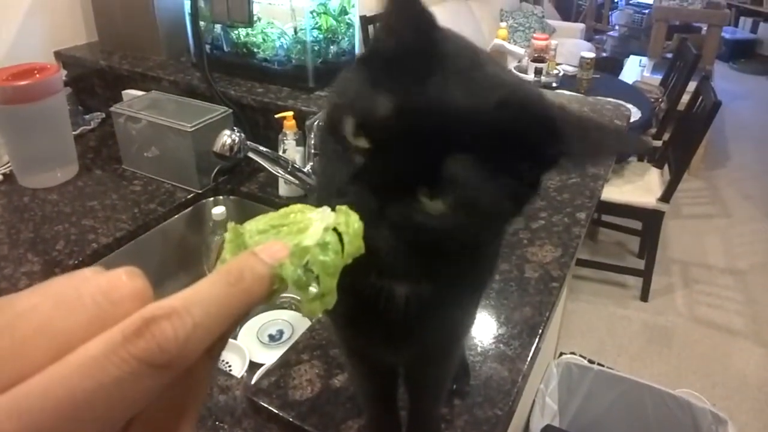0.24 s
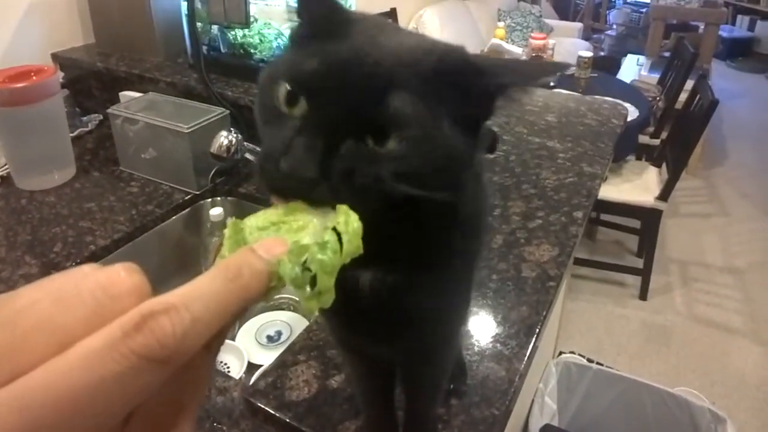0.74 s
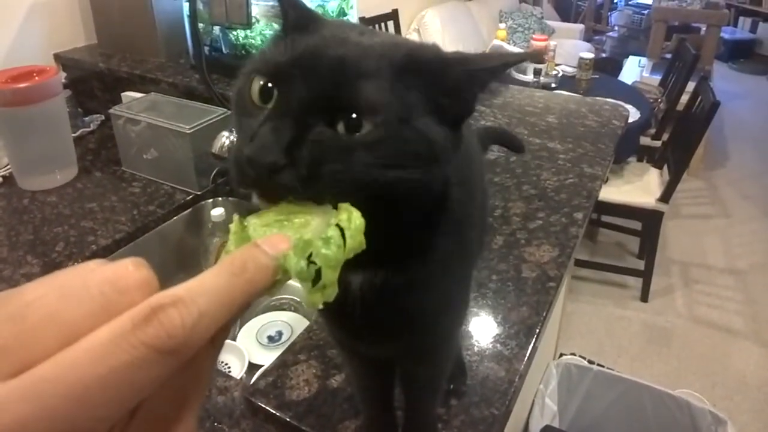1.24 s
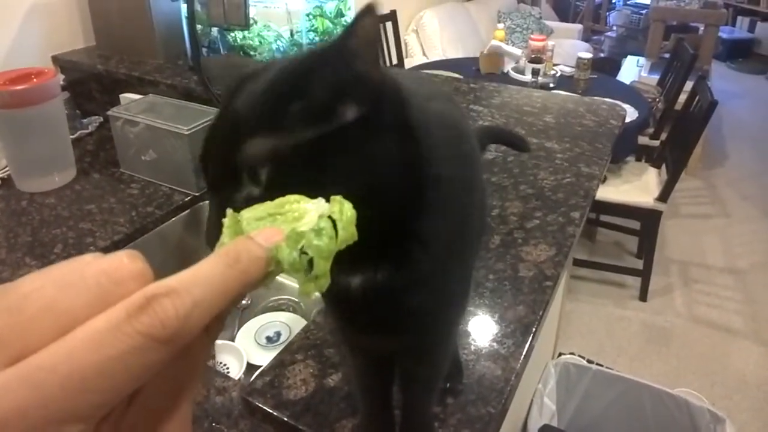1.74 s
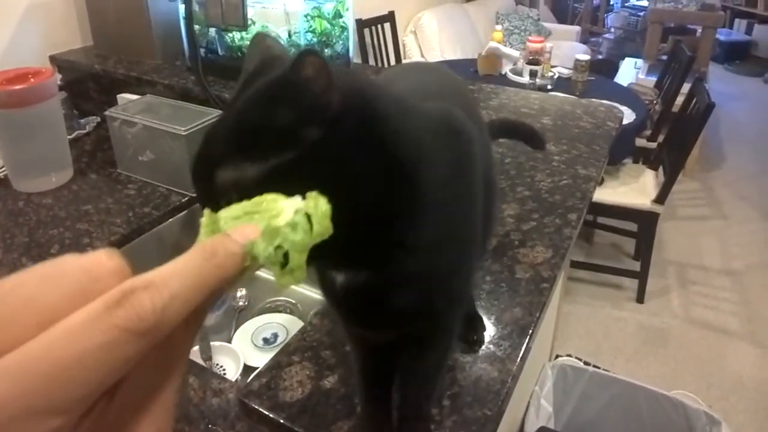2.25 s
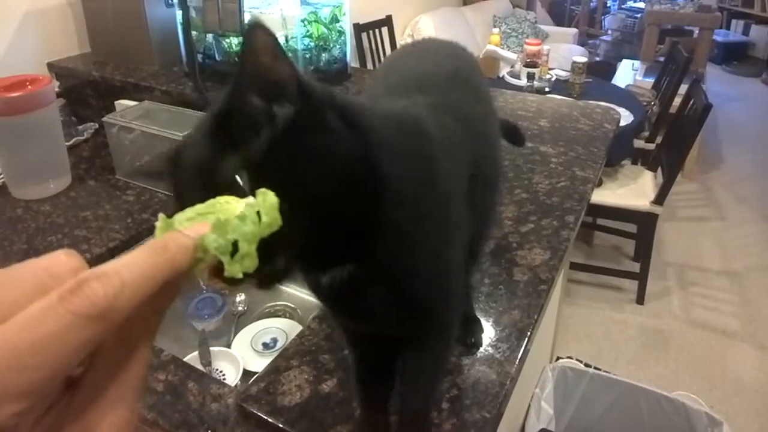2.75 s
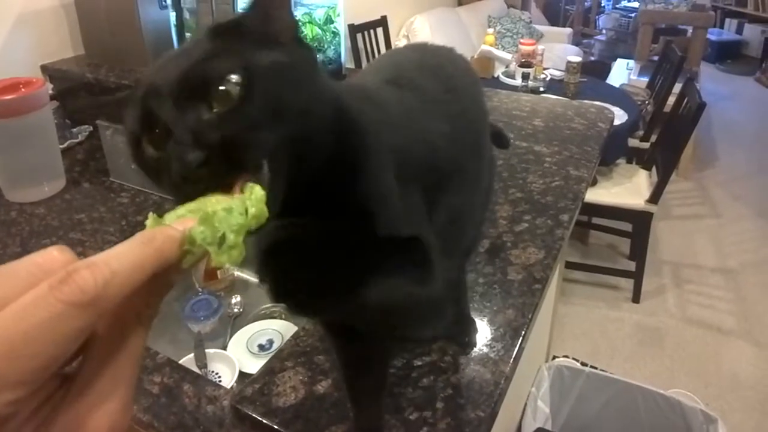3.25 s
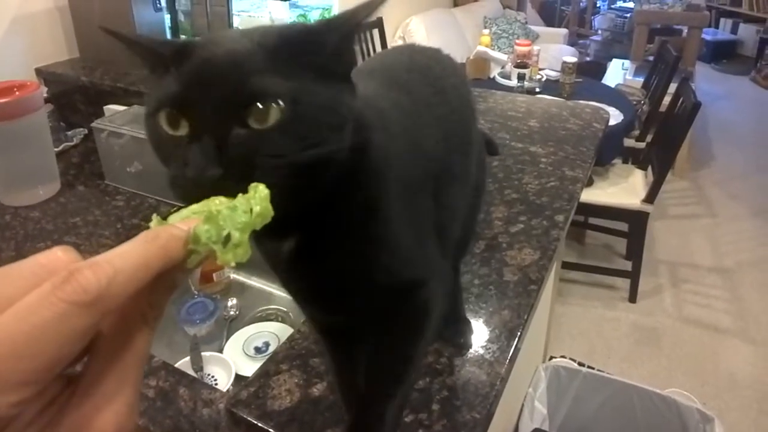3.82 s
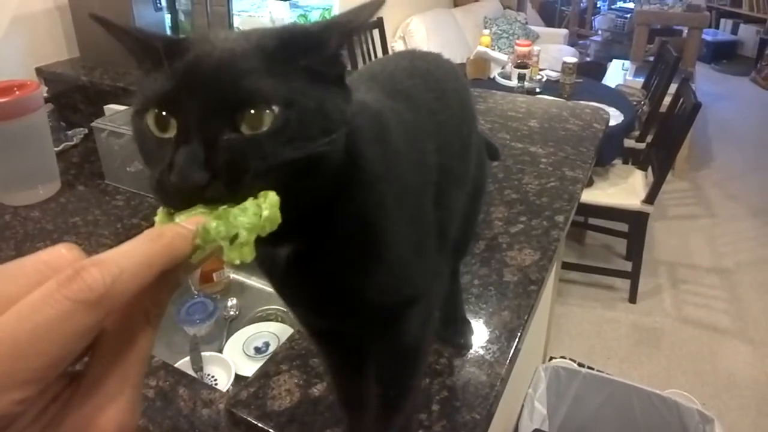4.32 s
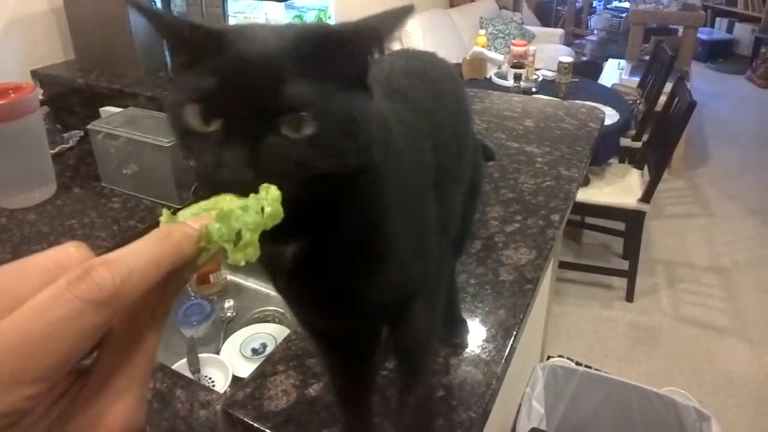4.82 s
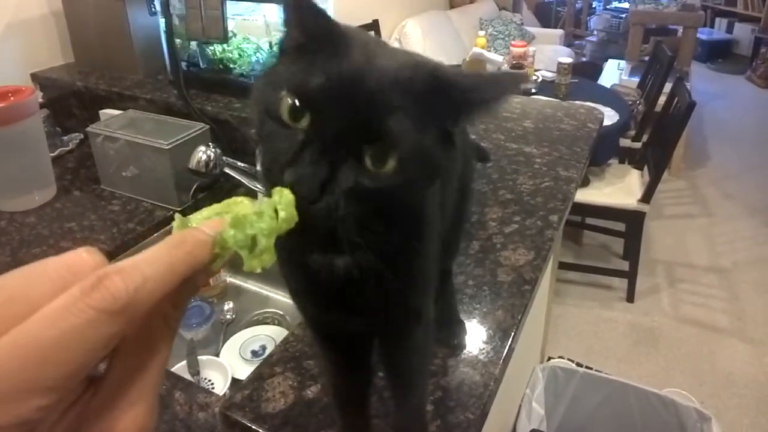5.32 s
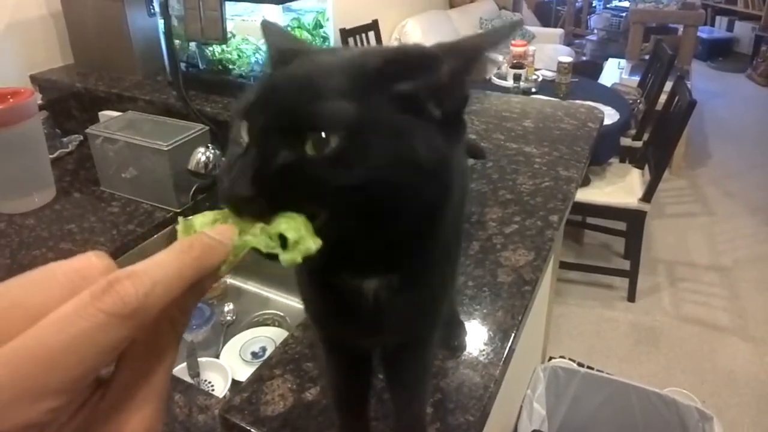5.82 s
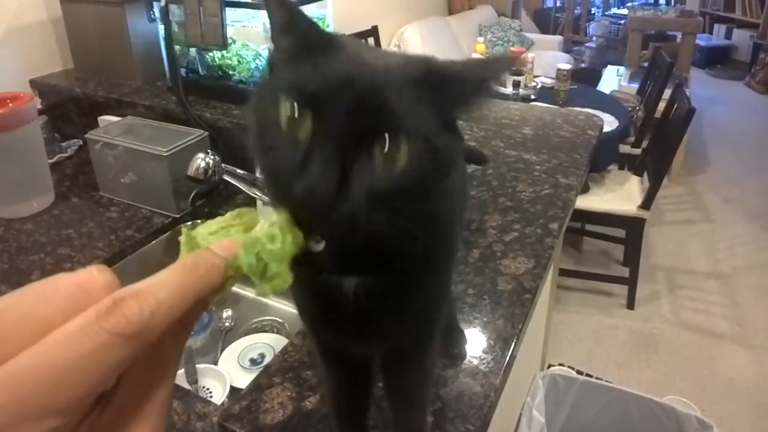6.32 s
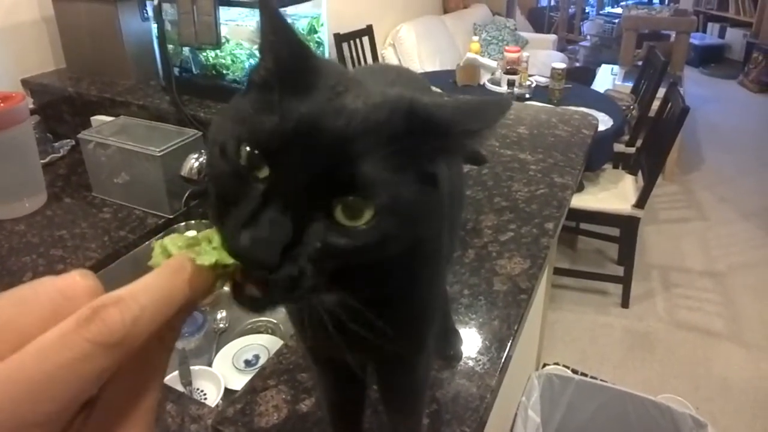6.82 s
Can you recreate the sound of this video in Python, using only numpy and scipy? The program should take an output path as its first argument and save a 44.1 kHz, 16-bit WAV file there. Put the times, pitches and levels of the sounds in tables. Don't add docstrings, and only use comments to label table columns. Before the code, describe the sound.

A phone close to a cat nibbling lettuce catches only faint, dry, millisecond crackles, while background household clatter dominates. Wood slaps and pot clanks bunch up early, dull thumps and shoves fill the middle, two hard knocks stand out later, then things quieten to light taps. The hard-surfaced room blurs each hit with brief echoes and muted ringing over a soft, uneven low rumble, motor hum and slight hiss.

```python
import sys
import numpy as np
from scipy import signal
from scipy.io import wavfile
from scipy.ndimage import uniform_filter1d

SR = 44100
rng = np.random.default_rng(int(sys.argv[2]) if len(sys.argv) > 2 else 0)


def store_pcm(level_fs):
    pcm = np.round(np.clip(level_fs, -1, 1) * 32767).astype(np.int16)
    wavfile.write(sys.argv[1], SR, np.atleast_2d(pcm).T)


def field_ratio(decibels):
    return 10 ** (np.asarray(decibels, dtype=float) / 20)


N = 311679
BAND_EDGES_HZ = 20 * 2 ** np.arange(0, 9.8, 1 / 3)
STEP = 16

# start in seconds, peak in dB, pitch in Hz, body in dB against the peak.
SNAPS = [(0.611, -59, 13900, -12), (1.6163, -65.5, 10300, -8), (1.672, -68, 13550, 1),
         (2.7743, -74.5, 8450, -8), (2.8018, -65.5, 13700, -12.5), (3.1747, -86, 13700, -8),
         (3.8821, -68.5, 8680, -8), (4.5626, -75, 10500, -8), (5.1766, -71, 12560, -12),
         (5.735, -60.5, 12250, -7.5), (5.7474, -64, 10200, -13), (5.817, -47.5, 11300, -10),
         (5.824, -58, 13300, -21), (5.834, -48, 13000, -24), (5.9947, -70, 8930, -14),
         (6.8665, -68.5, 10610, -15), (7.0519, -63, 10600, -14)]

# start in seconds, peak in dB at 500-1500 Hz, then thud, clack and sizzle in dB against it.
BLOWS = [(0.552, -57, 18, -2, -8.5), (0.751, -55, 5, -4, -12), (0.774, -44.5, 1, -5.5, -14),
         (0.947, -31, -1, 5, -7.5), (0.985, -38, -13, 2.5, -21.5), (1.205, -38.5, -5, -6, -27),
         (2.353, -52, -21, -14, -32), (3.032, -51, 2, -1, -24), (3.398, -40.5, 4, -11, -39),
         (3.438, -48, 12, -11, -57), (3.702, -38, -4.5, -9, -27.5), (4.087, -51.5, -8, -8, -26.5),
         (4.15, -56.5, 7.5, -3.5, -17.5), (4.67, -29.5, -10.5, -17, -25.5), (4.718, -44.5, -11, -15.5, -57),
         (5.305, -32.5, -5.5, -15.5, -19), (5.313, -28, -4.5, -9.5, -22.5), (5.379, -45.5, -29, -11, -22),
         (6.235, -44.5, -27, -11, -27)]
BROAD_BLOWS = [
    (0.908, -37, -8, -5, -21.5),
    (0.922, -39, -15, -5, -22),
    (1.136, -47, 12, 0.5, -23),
    (1.153, -32, -1, -1, -16),
    (3.366, -40.5, 4, -7.5, -22),
    (3.679, -37.5, -4, -17.5, -30),
    (4.754, -55, -6, -19, -48),
    (5.44, -56, -10, -17, -28),
    (5.62, -61, -8, -19, -40),
]
# start in seconds, peak in dB at 500-1500 Hz, then thud and sizzle in dB against it.
HARD_TAPS = [(0.004, -63.5, 14, -18), (0.129, -57.5, 13.5, -28), (0.605, -54.5, 11, -22),
             (0.649, -62, 5, -26), (1.666, -55, 7.5, -23), (1.931, -55, 9, -25.5), (2.013, -55.5, 3.5, -43),
             (2.899, -56, -9, -19), (3.221, -56.5, 7.5, -47), (5.498, -61, -18, -27),
             (5.524, -68.5, -1.5, -6.5), (6.025, -58, 3.5, -16), (6.211, -55, -2, -15),
             (6.799, -71, 13, -27), (6.941, -77, 1, -11.5)]
SOFT_TAPS = [(1.437, -62, 3.5, -32), (1.834, -56, -2, -35.5), (3.656, -59.5, -1, -27),
             (4.339, -62, -8, -20), (4.916, -64, 12.5, -37), (5.074, -67.5, 18.5, -25),
             (5.102, -60, 6, -43), (5.168, -59.5, -9, -28), (5.875, -61, -6.5, -33), (5.984, -66, 5, -16.5),
             (6.134, -56.5, -18, -42.5), (6.439, -59, -1.5, -34.5)]
SHOVES = [
    (0.43, -66.5, 21, -31),
    (0.723, -54.5, 5, -28),
    (2.292, -59, 5.5, -27),
    (2.806, -60.5, -5, -29),
    (2.932, -55.5, 3, -34),
    (4.068, -55.5, -0.5, -36),
    (1.9, -60.5, 7.5, -30),
    (2.21, -71, 3, -31),
    (4.54, -61, 10.5, -56),
    (4.59, -58.5, 10.5, -50),
]
KNOCK_EDGES_HZ = [150, 500, 1400, 5000, 14000]
# pitch in Hz, level in dB per Hz.
KNOCK_COLOUR = [(76, -49), (130, -14), (216, -2), (274, -8.5), (438, 1), (492, -7), (728, -2.5), (958, -8),
                (1360, -6), (1470, -16), (2100, -13.5), (2920, -22), (7930, -33.5), (9840, -27.5),
                (14000, -36)]
# pitch in Hz, time to fall 60 dB in seconds.
ROOM_T60 = [(150, 0.27), (700, 0.3), (2500, 0.28), (6000, 0.22), (9000, 0.24), (14000, .16)]
# pitch in Hz, width in Hz, level in dB over the smooth colour.
ROOM_MODES = [(232, 25, 2.5), (333.5, 8.6, 11), (433, 12, 5.5), (546, 44, -2), (614.3, 14, 3.5),
              (734, 5.3, 5.5), (782, 5.3, 9), (893.7, 30, 6.5), (1100, 17, 5.5), (1167, 14, -4),
              (1490, 7.4, -0.5), (1836, 14, 5), (2132, 68.8, 2), (2420, 18, 8), (4030, 45, 2)]

# start in seconds, peak in dB, pitch in Hz, time to fall 60 dB in seconds.
WOOD_RINGS = [(0.129, -40.5, 445, 0.18), (0.559, -38.5, 371, 0.17), (.785, -45, 780, 0.31),
              (0.953, -31, 383, 0.21), (1.16, -31, 380, 0.23), (1.384, -52, 443, 0.21),
              (1.841, -51, 1085, .097), (1.943, -35, 238, 0.11), (2.003, -29.5, 240.3, 0.12),
              (2.31, -39, 338, 0.16), (2.369, -43, 806, .076), (2.83, -49, 1100, .23),
              (2.935, -48, 890, 0.34), (3.389, -35, 413, 0.3), (3.646, -40, 154.4, 0.25),
              (4.675, -32, 1030, 0.14), (4.68, -39, 550, 0.15), (5.769, -52.5, 1000, 0.18),
              (5.799, -56.5, 1040, 0.13), (5.991, -64, 1030, 0.13), (6.029, -39, 232, 0.27),
              (6.44, -56.5, 1100, 0.22)]
# start in seconds, peak in dB, pitch in Hz.
DISH_RINGS = [(0.871, -52, 1900), (.949, -28, 2200), (.952, -45, 9400), (2.94, -63, 3800),
              (3.05, -50.5, 1800), (3.37, -60.5, 13200), (4.671, -53, 13000), (5.32, -48, 2300),
              (6.249, -56, 3700), (6.81, -71.5, 2700), (6.945, -74, 2540), (5.395, -65, 8700),
              (5.53, -75, 13400), (5.5, -70, 9400), (5.53, -72, 6800), (6.94, -77, 12500),
              (4.915, -81, 10700), (4.671, -55, 8700), (1.945, -67, 3900)]
CLEAR_RINGS = [
    (0.914, -28, 415, 0.28),
    (.985, -40, 2230, 0.18),
    (1.17, -33.5, 724, 0.28),
    (2.895, -76, 9700, .091),
    (.99, -66, 8780, .3),
    (4.156, -51.5, 4200, 0.075),
    (4.2, -82, 4330, .4),
    (5.315, -44.5, 4000, 0.14),
    (5.32, -28, 730, 0.23),
    (5.521, -72, 2430, 0.14),
]

# time in seconds, level in dB.
HOUSE = [(0.0, -64.5), (0.23, -59), (0.65, -56.5), (1.04, -60), (1.46, -63), (1.95, -52.5), (2.54, -58.5),
         (3.21, -57.5), (3.62, -56.5), (3.74, -59.5), (4.66, -56.5), (4.96, -64.5), (5.28, -50.5),
         (5.39, -58.5), (5.97, -61.5), (6.22, -55.5), (6.65, -60), (7.07, -61)]
# pitch in Hz, level in dB per Hz.
RUMBLE = [(12, -30), (20, -11), (31, -9.5), (49, -12.5), (117, -5), (168, -11), (233, -7), (291, -14),
          (416, -15), (560, -39.5), (700, -32), (910, -62), (1540, -120)]
# pitch in Hz, level in dB per Hz.
AIR = [(260, -30), (450, 0), (562, -2), (1040, -4), (1210, -8.5), (1620, -20), (2760, -24.5), (3080, -33.5),
       (5000, -64.5), (6500, -68), (11000, -120)]
# pitch in Hz, width in Hz, level in dB.
HUM = [(57, 16, -72), (121.7, 6.9, -64), (234, 9, -82), (350, 6.77, -71.5), (1100, 20, -89)]


def rms_one(x):
    return x / np.sqrt(np.mean(x ** 2) + 1e-20)


def at_hz(points, hz):
    points = np.array(points)
    return np.interp(np.log(hz), np.log(points[:, 0]), points[:, 1])


def drift(rate_hz):
    r = np.exp(-2 * np.pi * rate_hz * 40 / SR)
    slow = signal.lfilter([1], [1, -2 * r, r * r], rng.standard_normal(N // 40 + 2002))[2000:]
    return np.interp(np.arange(N) / 40, np.arange(len(slow)), rms_one(slow))


def resonance(x, hz, width_hz):
    r = np.exp(-np.pi * width_hz / SR)
    feedback = [1, -2 * r * np.cos(2 * np.pi * hz / SR), r * r]
    return signal.lfilter([(1 - r * r) / 2, 0, (r * r - 1) / 2], feedback, x)


def bands(low_hz, high_hz, order=2):
    white = rng.standard_normal((2, N))
    for k, (low, high) in enumerate(zip(BAND_EDGES_HZ, BAND_EDGES_HZ[1:])):
        centre = np.sqrt(low * high)
        if low_hz <= centre < high_hz:
            band = signal.butter(order, [low, high], "band", fs=SR, output="sos")
            yield centre, signal.sosfilt(band, white[k % 2])


def steady(spectrum, span_hz, patchy_db):
    together = drift(4.2)
    out = np.zeros(N)
    for hz, noise in bands(*span_hz):
        flicker_db = patchy_db * (0.7 * together + drift(8.1))
        out += field_ratio(at_hz(spectrum, hz) + flicker_db) * noise
    return rms_one(out)


def snaps():
    out, t = np.zeros(N + SR), np.arange(600) / SR
    for s, db, hz, body_db in SNAPS:
        crack = rng.standard_normal(len(t)) * np.exp(-t / 0.0016)
        bright = resonance(crack, hz, 2500) + 0.33 * resonance(crack, 9000, 7000)
        body = resonance(resonance(crack, 3000, 4500), 3430, 6300)
        snap = bright / abs(bright).max() + field_ratio(body_db + 3.5) * body / abs(body).max()
        out[int(s * SR):][:len(t)] += field_ratio(db) * snap
    return out[:N]


def knock_rows():
    rows = [(*row, 13.5) for row in BLOWS] + [(*row, 15.6) for row in BROAD_BLOWS]
    for table, clack_db, build_ms in [(HARD_TAPS, -4, 18.7), (SOFT_TAPS, -12, 13.9), (SHOVES, -4, 40)]:
        for s, db, thud, sizzle in table:
            clack = clack_db + 0.21 * sizzle
            rows.append((s, db, thud, clack, sizzle, build_ms))
    return np.array(rows)


def echoes(t, build_s, t60):
    pile = (1 - np.exp(-t / build_s)) ** 0.93 * np.exp(-(t / (2.02 * build_s)) ** 1.615)
    tail = (1 - np.exp(-t / (0.6 * build_s))) ** 2 * field_ratio(-120 * t / t60)
    shape = pile + 0.22 * tail
    return shape / shape.max()


def knock_colours(rows):
    usual_db = []
    for low, high in zip(KNOCK_EDGES_HZ, KNOCK_EDGES_HZ[1:]):
        hz = np.linspace(low, high, 200)
        power = np.mean(field_ratio(2 * at_hz(KNOCK_COLOUR, hz))) * (high - low) / SR * 2
        usual_db.append(10 * np.log10(power))
    parts = np.column_stack([rows[:, 2], np.zeros(len(rows)), rows[:, 3], rows[:, 4]])
    return rows[:, [1]] - 7 + parts - usual_db


def knocks():
    rows, t, out = knock_rows(), np.arange(0, 0.45, STEP / SR), np.zeros(N)
    colours = knock_colours(rows)
    voices = [(hz, noise, 1.0) for hz, noise in bands(140, 15000, order=3)]
    for hz, width, db in ROOM_MODES:
        tone = resonance(resonance(rng.standard_normal(N), hz, width), hz, 4 * width)
        voices.append((hz, field_ratio(db) * tone, 2.5))
    luck = rng.standard_normal((len(rows), len(voices)))
    glints = drift(160.0)
    for k, (hz, noise, spread_db) in enumerate(voices):
        power, t60 = np.zeros(N // STEP + len(t) + 1), at_hz(ROOM_T60, hz)
        for j, row in enumerate(rows):
            thud, middle, clack, sizzle = colours[j]
            colour = np.transpose([[350, 600, 1100, 1600, 4000, 6200],
                                   [thud, middle, middle, clack, clack, sizzle]])
            build_s = row[5] / 1000 * (1000 / hz) ** 0.11
            level_db = at_hz(colour, hz) + spread_db * luck[j, k]
            power[int(row[0] * SR / STEP):][:len(t)] += field_ratio(2 * level_db) * echoes(t, build_s, t60)
        height = np.interp(np.arange(N) / STEP, np.arange(len(power)), np.sqrt(power))
        glint_db = np.clip(np.log2(hz / 1500), 0, 2) * glints
        out += height * field_ratio(at_hz(KNOCK_COLOUR, min(hz, 13400)) + glint_db) * noise
    return out * field_ratio(0.51 * drift(113.6))


def ring_rows():
    rows = [(s, db, hz, hz / 6.0, t60) for s, db, hz, t60 in WOOD_RINGS]
    rows += [(s, db, hz, hz / 5.0, 0.11) for s, db, hz in DISH_RINGS]
    rows += [(s, db, hz, hz / 16, t60) for s, db, hz, t60 in CLEAR_RINGS]
    return rows


def rings():
    out, t = np.zeros(N + SR), np.arange(SR // 4) / SR
    for s, db, hz, width_hz, t60 in ring_rows():
        tone = resonance(rng.standard_normal(len(t) * 2), hz, width_hz)
        tone = resonance(tone, hz, 1.607 * width_hz)
        tone = resonance(tone, hz, 3.2 * width_hz)[len(t):]
        swell = field_ratio(-60 * t / t60) * (1 - np.exp(-t / 0.0068))
        strength = np.sqrt(np.average(tone ** 2, weights=swell ** 2))
        out[int(s * SR):][:len(t)] += field_ratio(db - 4.0) * swell * tone / strength
    return out[:N]


def lingering():
    linger_db, t60_s = -33.5, 0.99
    s, db = np.transpose([*BLOWS, *BROAD_BLOWS])[:2]
    power = np.zeros(N)
    power[(s * SR).astype(int)] = field_ratio(2 * (db + linger_db))
    power = signal.lfilter([1], [1, -field_ratio(-120 / (t60_s * SR))], power + 1e-18)
    return np.sqrt(uniform_filter1d(power, size=2000) + 1e-18)


def house():
    s, rumble_db = np.transpose(HOUSE)
    air_db = -74.5 + 0.45 * (rumble_db - rumble_db.mean())
    time = np.arange(N) / SR
    deep = field_ratio(-60) * steady(RUMBLE, (20, 150), patchy_db=1.6)
    rumble = field_ratio(np.interp(time, s, rumble_db)) * steady(RUMBLE, (150, 520), patchy_db=1.5)
    air_height = np.hypot(field_ratio(np.interp(time, s, air_db)), lingering())
    air = air_height * steady(AIR, (520, 5000), patchy_db=1.0)
    hum = np.zeros(N)
    for hz, width, db in HUM:
        hum += field_ratio(db) * rms_one(resonance(rng.standard_normal(N), hz, width))
    hiss_colour = [(4000, -4.0), (6300, -9.5), (9000, 2.5), (15000, 3.5)]   # (Hz, dB per Hz)
    hiss = field_ratio(-95.5) * steady(hiss_colour, (4500, 16000), patchy_db=2.5)
    return deep + rumble + air + hum + hiss


def scene():
    return np.tile(snaps() + knocks() + rings() + house(), (2, 1))


def roll_off(x):
    return signal.sosfilt(signal.butter(12, 15060, fs=SR, output="sos"), x)


def record(dry):
    treble = signal.sosfilt(signal.butter(4, 4600, "high", fs=SR, output="sos"), dry[0])
    scatter = rms_one(signal.lfilter([1], [1, -0.93], rng.standard_normal(N)))
    side_cut = signal.cheby2(8, 60, 3300, "high", fs=SR, output="sos")
    side = field_ratio(-6.0) * signal.sosfilt(side_cut, treble * scatter)
    wide = dry + side * [[1], [-1]]
    rounded = 0.16 * np.tanh(wide / 0.16)
    top_cut = signal.ellip(10, 0.5, 60, 14350, fs=SR, output="sos")
    mix = signal.sosfilt(top_cut, rounded) - 0.0025
    return roll_off(mix)


dry = scene()
out = record(dry)
store_pcm(out)
```